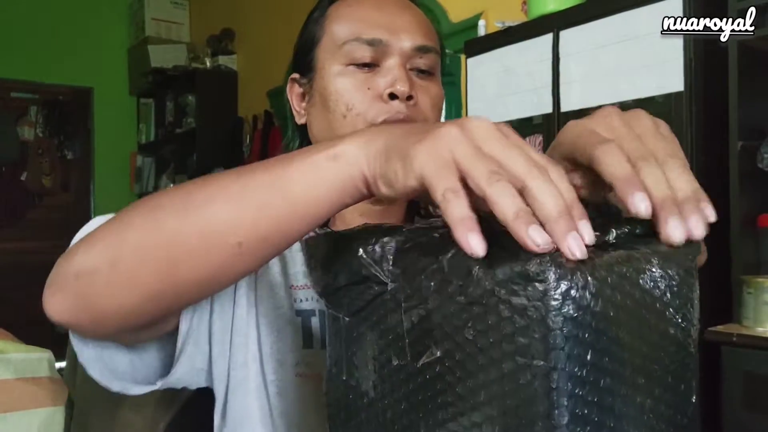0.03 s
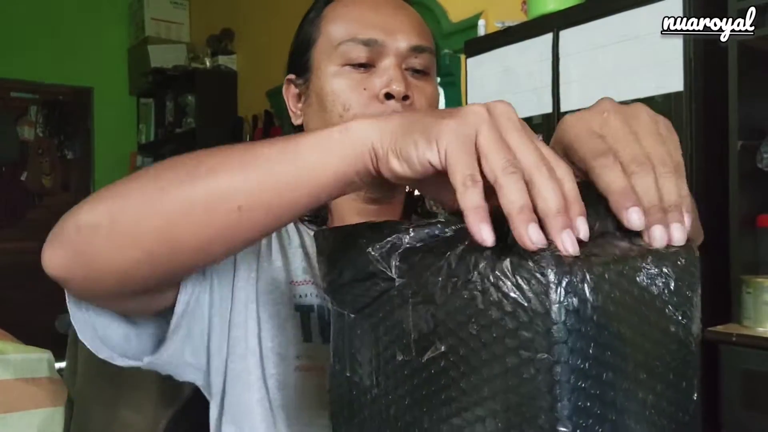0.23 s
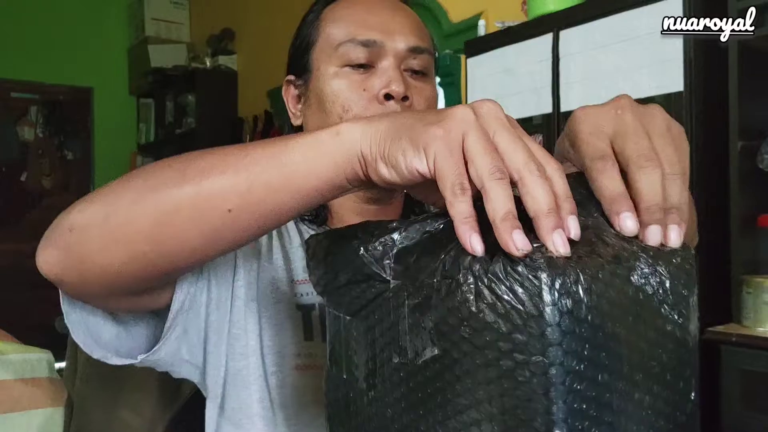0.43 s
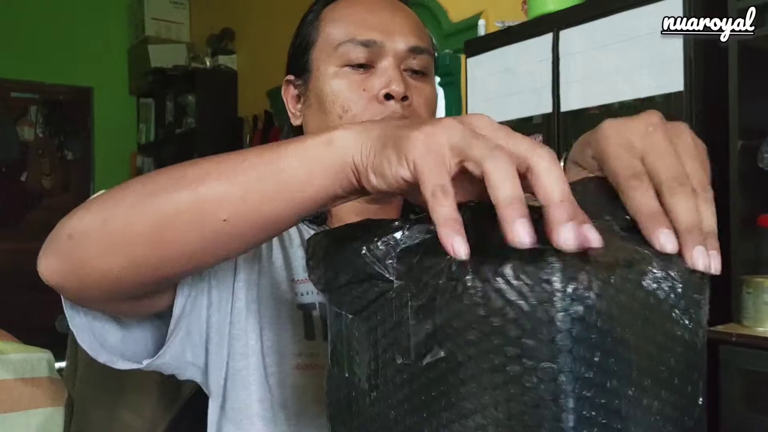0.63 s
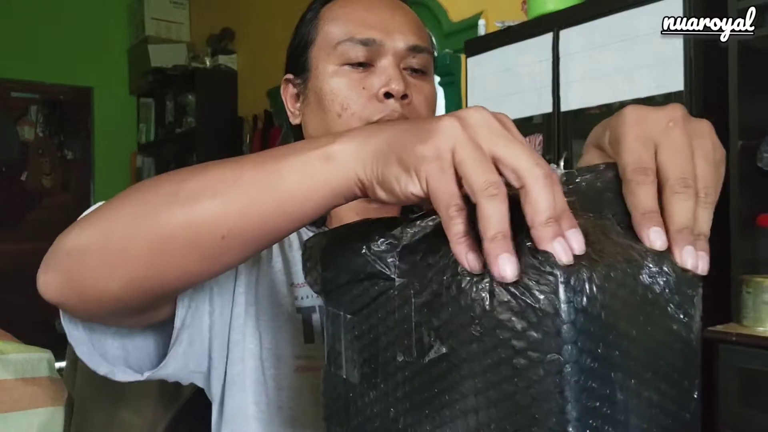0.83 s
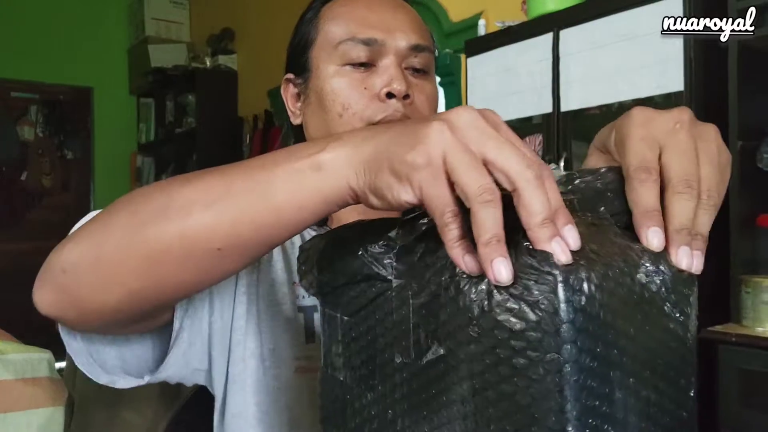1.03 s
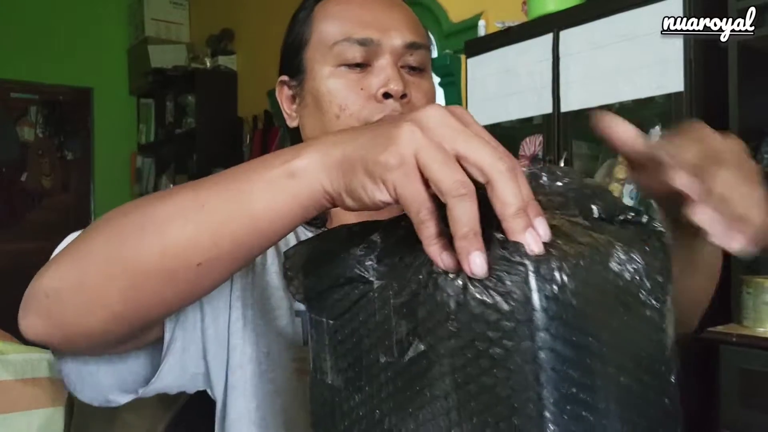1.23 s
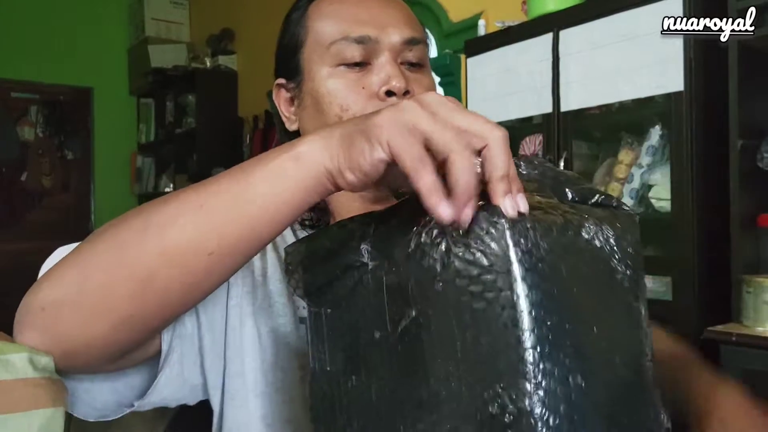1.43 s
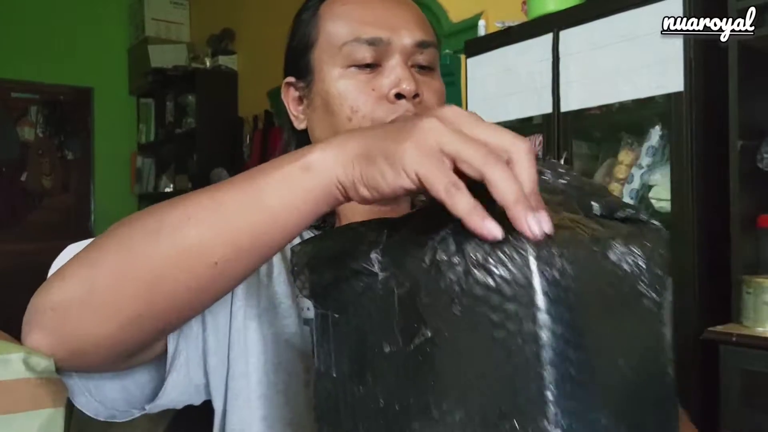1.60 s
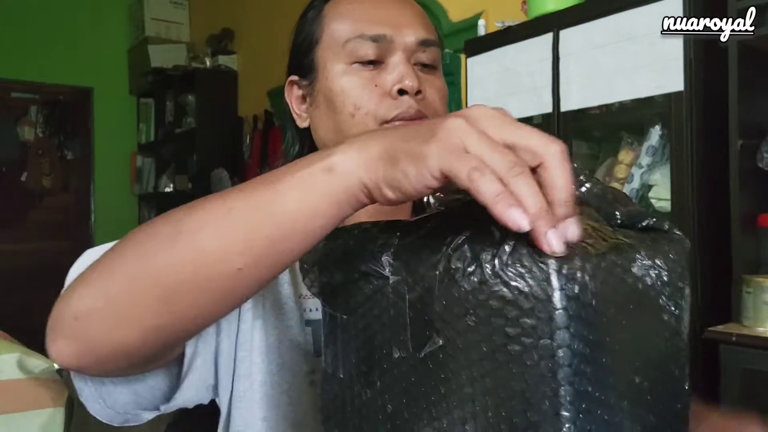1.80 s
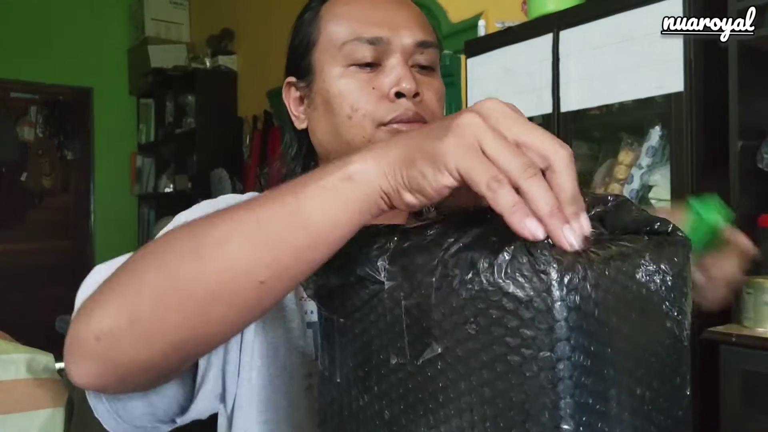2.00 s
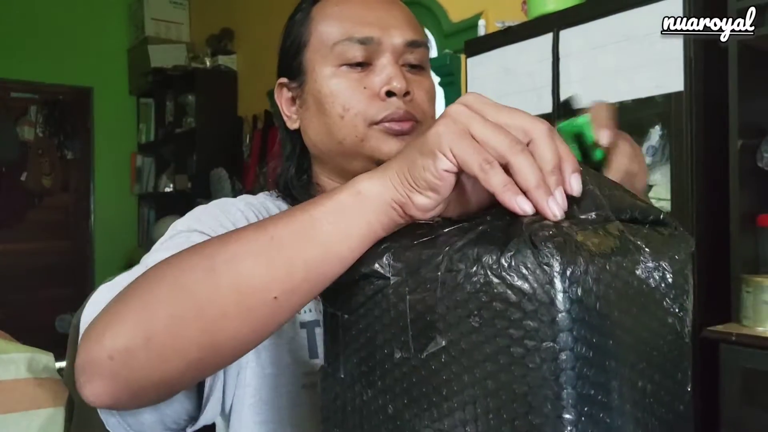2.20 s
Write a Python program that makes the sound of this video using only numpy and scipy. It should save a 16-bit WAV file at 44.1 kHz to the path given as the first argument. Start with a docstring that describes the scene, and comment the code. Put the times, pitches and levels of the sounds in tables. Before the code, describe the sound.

Bubble wrap on a parcel crinkles and ticks in uneven runs as fingers press it, close up in a small room. Snaps cluster around 0.25 seconds, and hard pops come at about 0.4, 0.9 and 1.6 seconds. Hands bump softly, with a faint slide near 1.4. More ticks follow from 2 to 2.3 seconds. Underneath are low room noise, hiss and a thin whine that grows slightly late.

```python
"""A small room, close up: fingers press and shift taut plastic and bubble wrap around a parcel.
Creases snap in sharp ticks; three hard pops also ring the trapped air and the parcel under the film.
Each press sets off a run of fine crinkles, fingertips stick and slip, hands bump and slide on the parcel.
Behind it: low room noise, hiss, a faint hum and a thin whine that grows late."""
import sys
import numpy as np
from scipy import signal
from scipy.fft import rfft, irfft
from scipy.io import wavfile
from scipy.ndimage import uniform_filter1d

SR = 44100
rng = np.random.default_rng(int(sys.argv[2]) if len(sys.argv) > 2 else 0)


def put_to_file(sound):
    """Save the sound as 16-bit audio at rate SR, in the file named by the first command-line argument."""
    columns = np.atleast_2d(sound).T  # one column per channel
    safe = np.clip(columns, -1, 1)
    whole_steps = np.round(safe * 32767)
    wavfile.write(sys.argv[1], SR, whole_steps.astype(np.int16))


N = 103635
T = np.arange(N) / SR

# spectra (frequency [Hz], relative density [dB])
ROOM_NOISE_SPECTRUM = [(25, 7.5), (60, -3.5), (110, -7), (210, 4.5), (400, -7), (800, -5), (1500, -13.5),
                       (3000, -13.5), (5000, -31.5), (11000, -62)]
HISS_SPECTRUM = [(2000, -15.5), (5500, -12.5), (6400, 7), (8300, -4), (9900, 6.5), (10600, -42),
                 (15000, -31)]
SLIDE_SPECTRUM = [(400, -32), (660, -9), (800, 2.5), (960, 2), (1200, -18.5), (2500, -12.5), (5000, -50)]
SCRAPE_SPECTRUM = [(1500, -21), (3000, -9), (4500, 0.5), (6200, -1), (8000, -9), (11000, -34)]
RUB_SPECTRUM = [(50, -17), (120, 1.5), (230, 5.5), (450, 0.5), (900, 2), (1500, -0.5), (2600, -3),
                (4500, -17), (8000, -29), (11000, -67)]
CREASE_SPECTRUM = [(100, -49.5), (400, -18), (1000, -13), (2500, -9.5), (4500, -10.5), (6200, -8),
                   (7500, -2), (8600, -0.5), (9700, -11), (11300, -28.5), (14500, -27), (16000, -39)]
FLUTTER_SPECTRUM = [(60, -20), (150, -5), (450, -5.5), (900, -6), (1500, 2), (2600, -8), (3500, -19),
                    (5000, -17.5), (8400, 2.5), (10500, -21.5), (15000, -41)]
# steady tones (frequency [Hz], level [dB])
STEADY_TONES = [(538, -61), (9808, -66)]
# whine envelope (time [s], level [dB])
WHINE_LEVELS = [(0, -64), (.5, -59), (1.3, -59), (1.85, -57.5), (2.0, -53), (2.35, -52.5)]
# near-surface echoes (delay [s], left gain, right gain)
REFLECTIONS = [(.0011, .12, 0.21), (.0026, .33, 0.018)]
# finger bumps on the parcel (time [s], frequency [Hz], level [dB])
FINGER_BUMPS = [(.234, 234, -37), (0.253, 220, -30.5), (0.319, 220, -34.5), (0.627, 196, -32.5),
                (1.192, 179, -38), (1.335, 220, -36), (2.025, 230, -53), (2.194, 217, -38)]
# fingertip drags (peak time [s], rise sigma [s], fall sigma [s], level [dB])
FINGER_DRAGS = [(.251, .002, 0.07, -37), (.85, 0.087, .02, -46), (2.165, 0.023, 0.018, -55)]
# presses (peak time [s], rise sigma [s], fall sigma [s], crinkle [dB], rub [dB])
FINGER_PRESSES = [(.03, 0.056, 0.085, -42, -54), (0.193, 0.047, 0.083, -42, -52.5),
                  (0.264, 0.0094, 0.059, -35.5, -47), (0.386, 0.0034, 0.04, -42, -39.5),
                  (0.649, 0.079, 0.072, -43.5, -53.5), (.84, 0.069, 0.062, -38, -48.5),
                  (1.07, 0.017, 0.15, -45.5, -56), (1.205, 0.018, 0.0088, -44, -54),
                  (1.42, 0.053, 0.087, -48, -53.5), (1.587, 0.0034, 0.0052, -36.5, -36),
                  (1.65, 0.042, 0.023, -42, -34.5), (1.75, 0.026, 0.015, -50, -48.5),
                  (1.90, 0.079, 0.075, -46, -55), (2.04, 0.017, 0.052, -44.5, -54),
                  (2.171, 0.026, 0.021, -41, -48.5)]
# crease snaps (time [s], level [dB], left-right [dB], body [dB], sizzle [dB])
CREASE_SNAPS = [(.2321, -10, 6.5, -1.5, -4), (.2490, -2.5, 0, -1.5, -3), (.2577, -15, 10, -13, -8),
                (.2698, -12.5, 11, -1, -10), (.2775, -15, 11, -0.5, -4), (.2896, -11, 8, -9, -3),
                (.3088, -11.5, 8, -2, -3), (.3315, -9.5, 6, -3, -2), (.6513, -14, -2, -7.5, -7),
                (.8338, -18.5, 11, 5, 17), (.8700, -4, 3.5, 3.5, 6), (1.0435, -10.5, 6, 0.5, 2),
                (1.0546, 0.5, 6.5, -7.5, 6), (1.1257, -10, -4, -6, -6), (1.1942, -15.5, 5, 5, 4),
                (1.2084, -23, -1, -14, 2), (1.2155, -15, 0, -5, 6), (1.4926, -10, 0, -5.5, 1),
                (1.5829, -28, 1, -7, -4), (1.5920, -7, 7, -11, -2), (1.759, -24, 2, 8, -3),
                (2.0271, -9.5, -1.5, -3.5, 0), (2.0884, -6.5, 1, -16.5, 3.5), (2.1421, -19, -1, 3, 5),
                (2.167, -19.5, 0, 2, 0), (2.1732, -19.5, 14, 3.5, 9), (2.2003, -21, 6, 5.5, 10),
                (2.2346, -14, 3, -7, 6), (2.2951, -17.5, 0, -6, -3)]
# pops (time [s], crack [dB], left-right [dB], body [dB], sizzle [dB], flutter [dB], flutter T60 [s])
HARD_POPS = [(0.3725, 4, 2, 1, 4.5, -24.5, 0.014), (0.8782, 6.5, 4, -1.5, 1.5, -20, 0.02),
             (1.6052, 1, -6, -0.5, -6, -14.5, 0.025)]
# air pocket and parcel modes after the pops (time [s], frequency [Hz], level [dB], T60 [s])
POP_RINGS = [(.3732, 2190, -7.5, 0.0072), (.3758, 722, -2.5, 0.011), (.376, 233, -25, 0.044),
             (.8788, 1490, -11.5, 0.0042), (.8815, 680, -26.5, 0.013), (.8812, 281, -23, 0.024),
             (1.6062, 892, -13.5, 0.025), (1.6054, 1760, -11, 0.0079), (1.6065, 387, -21, .032)]

ROOM_NOISE_DB, HISS_DB, HISS_TONES_PAN_DB = -56, -49, 6
WHINE_HZ, WAVER_RATIO = 6556, 0.00082
ROOM_LOW_T60_S, ROOM_HIGH_T60_S, ROOM_LOW_DB, ROOM_HIGH_DB, ROOM_ONSET_S = 0.43, 0.5, -6, -6.5, 0.0023
BUMP_RISE_S, BUMP_T60_S, PARCEL_PAN_DB = 0.0026, 0.055, 8.5
SLIDE_START_S, SLIDE_END_S, SLIDE_EDGE_S, SLIDE_DB = 1.33, 1.57, 0.072, -52
SLIPS_PER_S = 3000
CRINKLES_PER_S, CRINKLE_SPREAD_DB, CRINKLE_PAN_DB = 1500, 1.5, 1.5
SHIVER_S, SHIVER_GAIN = 0.0006, 1.13
BODY_HZ, BRIGHT_HZ, SIZZLE_HZ = 5000, 8240, 10750
BEND_LAG_S, BEND_HZ = 0.004052, 1286
RING_RISE_S, RING_SAG_RATIO, RING_SAG_S = 0.00086, 0.34, 0.0022
LOWPASS_HZ = 15600


def amp(db):
    """Decibels to gain."""
    return 10 ** (np.asarray(db) / 20)


def pan(db):
    """Stereo gains for a left-right level difference."""
    return amp(np.array([[db], [-db]]) / 2)


def unit_rms(x):
    """Scale to rms 1."""
    return x / np.sqrt(np.mean(x ** 2))


def colour(x, spectrum):
    """Minimum-phase filter; keeps the power of white noise."""
    hz, db = np.array(spectrum, float).T
    bins_hz = np.maximum(np.arange(N + 1) * SR / (2 * N), 1)
    gain = unit_rms(amp(np.interp(np.log(bins_hz), np.log(hz), db)))
    cepstrum = irfft(np.log(gain))[:N]
    cepstrum[1:] *= 2
    return irfft(rfft(x, 2 * N) * np.exp(rfft(cepstrum, 2 * N)))[..., :N]


def noise(correlation):
    """Partly correlated stereo white noise."""
    common = np.sqrt(correlation) * rng.standard_normal(N)
    return common + np.sqrt(1 - correlation) * rng.standard_normal((2, N))


def decay(start_s, t60_s):
    """Step onset, exponential decay."""
    return (T >= start_s) * np.exp(-np.log(1000) * np.maximum(T - start_s, 0) / t60_s)


def swell(peak_s, rise_s, fall_s):
    """Finger effort: an asymmetric Gaussian."""
    return np.exp(-((T - peak_s) / np.where(T < peak_s, rise_s, fall_s)) ** 2 / 2)


def ring(start_s, hz, rise_s, t60_s, sag=0):
    """Damped mode; starts sharp by the fraction sag, then settles."""
    age_s = np.maximum(T - start_s, 0)
    cycles = hz * (age_s + sag * RING_SAG_S * (1 - np.exp(-age_s / RING_SAG_S)))
    return decay(start_s, t60_s) * (1 - np.exp(-age_s / rise_s)) * np.sin(2 * np.pi * cycles)


def tone(hz):
    """Sine at rms 1, slightly wavering in pitch."""
    waver = unit_rms(uniform_filter1d(rng.standard_normal(N), size=500))
    return np.sqrt(2) * np.sin(2 * np.pi * np.cumsum(hz * (1 + WAVER_RATIO * waver)) / SR)


def background():
    """Low room noise, hiss, two steady tones and a growing whine."""
    tones = sum(amp(db) * tone(hz) for hz, db in STEADY_TONES)
    whine = amp(np.interp(T, *np.array(WHINE_LEVELS).T)) * tone(WHINE_HZ)
    room_noise = amp(ROOM_NOISE_DB) * colour(noise(0.4), ROOM_NOISE_SPECTRUM) * pan(db=11)
    hiss = amp(HISS_DB) * colour(noise(0.033), HISS_SPECTRUM)
    return room_noise + (tones + whine + hiss) * pan(HISS_TONES_PAN_DB)


def room(x):
    """Direct sound, near-surface echoes and a short diffuse tail from the walls."""
    t = T[:SR // 2]
    response = 0
    for kind, t60_s, db in ("low", ROOM_LOW_T60_S, ROOM_LOW_DB), ("high", ROOM_HIGH_T60_S, ROOM_HIGH_DB):
        crossover = signal.butter(2, 3500, kind, fs=SR, output="sos")
        band = signal.sosfilt(crossover, rng.standard_normal((2, len(t))))
        envelope = np.exp(-np.log(1000) * t / t60_s) * (1 - np.exp(-t / ROOM_ONSET_S))
        response += band * envelope * amp(db) / np.linalg.norm(envelope)
    for delay_s, left, right in REFLECTIONS:
        response[:, int(delay_s * SR)] += left, right
    return x + signal.fftconvolve(x, response, axes=1)[:, :N]


def handling():
    """Fingers bump the parcel; a sliding hand excites its hollow resonance."""
    bumps = sum(amp(db) * ring(s, hz, BUMP_RISE_S, BUMP_T60_S) for s, hz, db in FINGER_BUMPS)
    contact = np.clip(np.minimum(T - SLIDE_START_S, SLIDE_END_S - T) / SLIDE_EDGE_S + .5, 0, 1)
    slide = amp(SLIDE_DB) * colour(contact * noise(0.61), SLIDE_SPECTRUM)
    return (bumps + slide) * pan(PARCEL_PAN_DB)


def scrapes():
    """Fingertip stick-slip on taut film: dense random impulses."""
    effort = sum(amp(db) * swell(*timing) for *timing, db in FINGER_DRAGS)
    slips = unit_rms((rng.random(N) < SLIPS_PER_S / SR) * noise(0.6))
    return colour(slips * effort, SCRAPE_SPECTRUM)


def presses():
    """Pressed film: many tiny buckles of uneven size, plus a dull rub."""
    crinkle_gain = sum(amp(db) * swell(*timing) for *timing, db, _ in FINGER_PRESSES)
    rub_gain = sum(amp(db) * swell(*timing) for *timing, _, db in FINGER_PRESSES)
    sizes = amp(CRINKLE_SPREAD_DB * np.minimum(rng.exponential(size=N), 4))
    onsets = rng.random(N) < CRINKLES_PER_S / SR
    buckles = unit_rms(onsets * sizes * np.sign(noise(0.73)))
    crinkle = colour(buckles * crinkle_gain, CREASE_SPECTRUM) * pan(CRINKLE_PAN_DB)
    rub = colour(noise(0.63) * rub_gain, RUB_SPECTRUM) * pan(db=7)
    return crinkle + rub


def snaps(events):
    """Crease snaps: impulse plus brief film shiver. Low bending waves are slower and arrive late."""
    out = np.zeros((2, N))
    size, lead = 1024, 64  # samples
    hz = np.arange(size // 2 + 1) * SR / size
    lag_cycles = BEND_LAG_S * BEND_HZ * np.arctan(hz / BEND_HZ) + hz * lead / SR
    dispersion = np.exp(-2j * np.pi * lag_cycles)
    damping = np.exp(-T[:size] / SHIVER_S)
    for time_s, db, pan_db, body_db, sizzle_db in events:
        shiver = rng.standard_normal((2, size)) * damping * (1 - damping)
        snap = SHIVER_GAIN * shiver / np.linalg.norm(shiver, axis=1, keepdims=True)
        snap[:, 0] += 1  # impulse
        tint = amp(db + np.interp(hz, (BODY_HZ, BRIGHT_HZ, SIZZLE_HZ), (body_db, 0, sizzle_db)))
        start = int(time_s * SR) - lead
        out[:, start:start + size] += irfft(rfft(snap) * tint * dispersion) * pan(pan_db)
    return colour(out, CREASE_SPECTRUM)


def pops():
    """Crack, film flutter, and air and parcel rings that sag in pitch as the film slackens."""
    cracks = snaps([pop[:-2] for pop in HARD_POPS])
    flutter_gain = sum(amp(db) * decay(s, t60_s) for s, *_, db, t60_s in HARD_POPS)
    flutter = colour(flutter_gain * noise(0.73), FLUTTER_SPECTRUM)
    rings = sum(amp(db) * ring(s, hz, RING_RISE_S, t60_s, RING_SAG_RATIO)
                for s, hz, db, t60_s in POP_RINGS)
    return cracks + (rings + flutter) * pan(PARCEL_PAN_DB)


def scene():
    """Handled wrap in the room, over the background."""
    return room(snaps(CREASE_SNAPS) + pops() + presses() + scrapes() + handling()) + background()


def record(dry):
    """Clip at full scale, then zero-phase low-pass."""
    lowpass = signal.ellip(8, .1, 60, LOWPASS_HZ, fs=SR, output="sos")
    return signal.sosfiltfilt(lowpass, np.clip(dry, -1, 1))


dry = scene()
out = record(dry)
put_to_file(out)
```